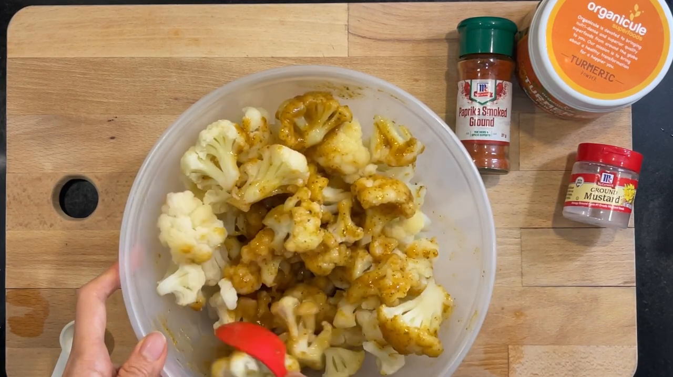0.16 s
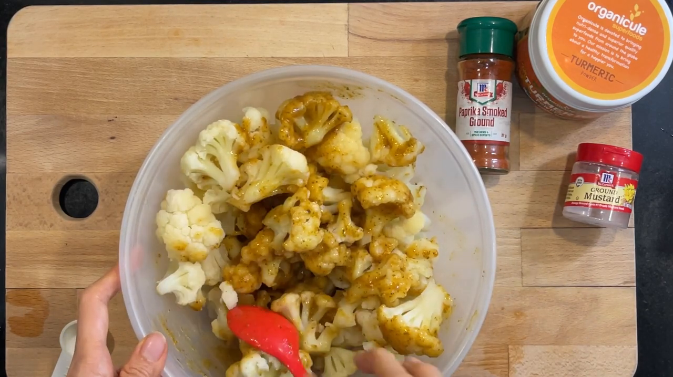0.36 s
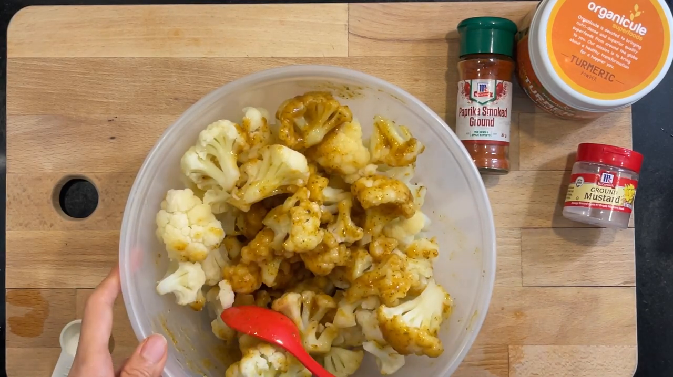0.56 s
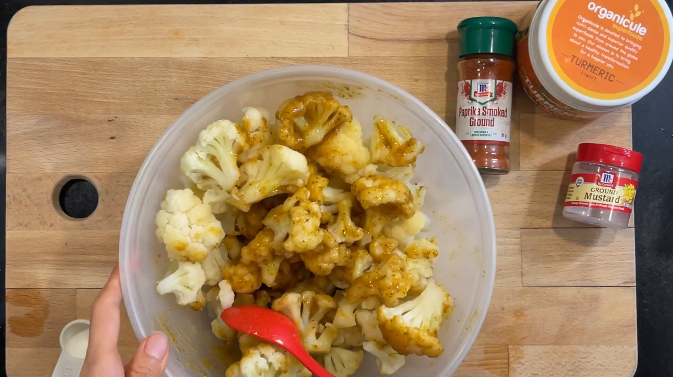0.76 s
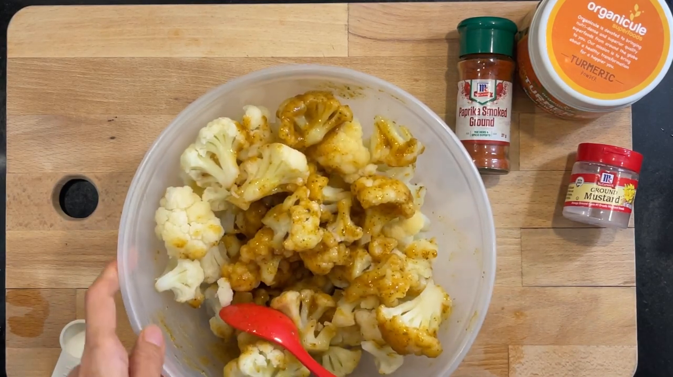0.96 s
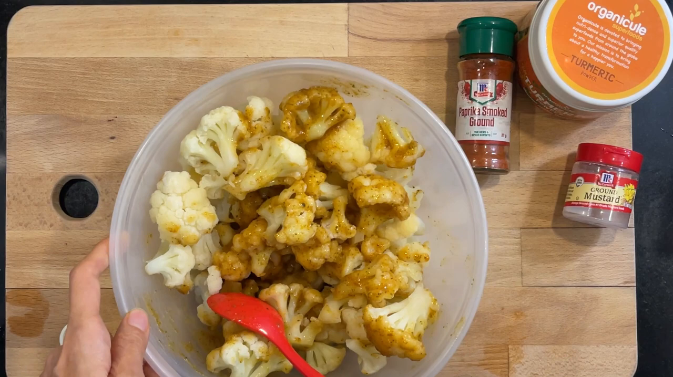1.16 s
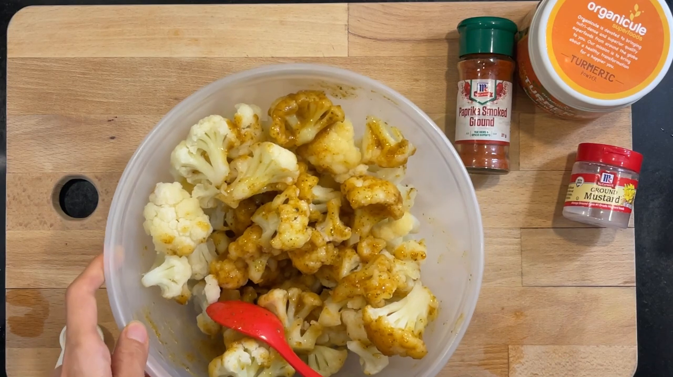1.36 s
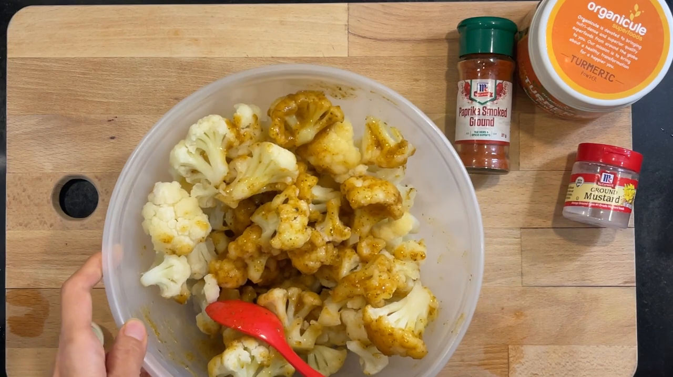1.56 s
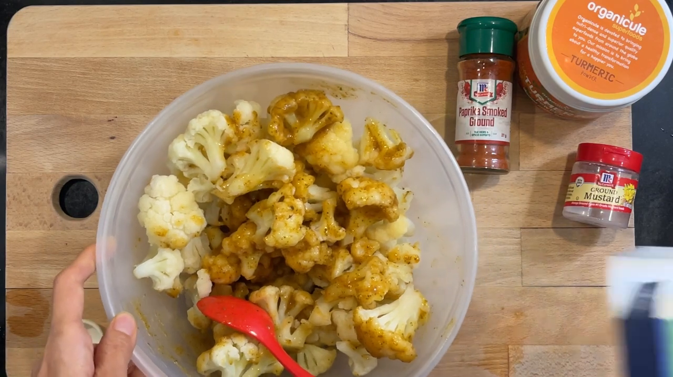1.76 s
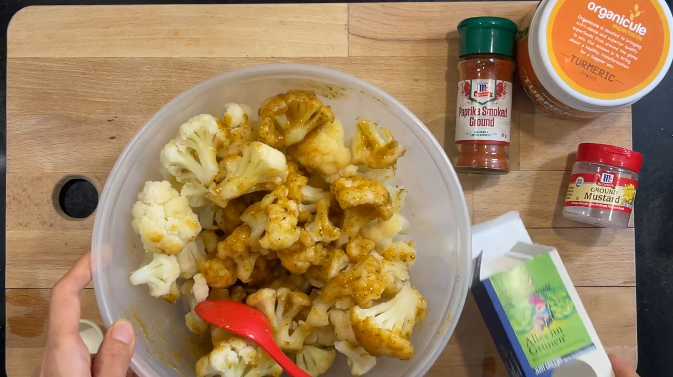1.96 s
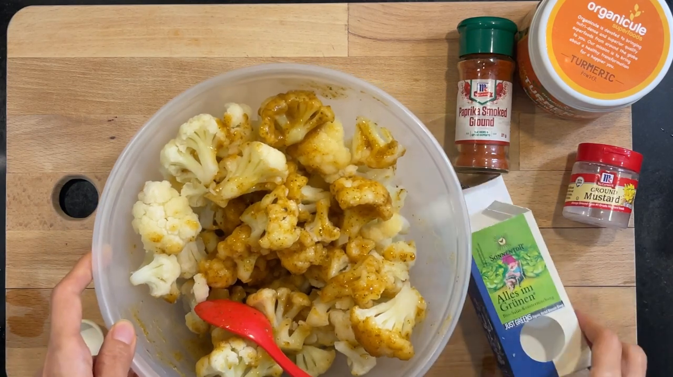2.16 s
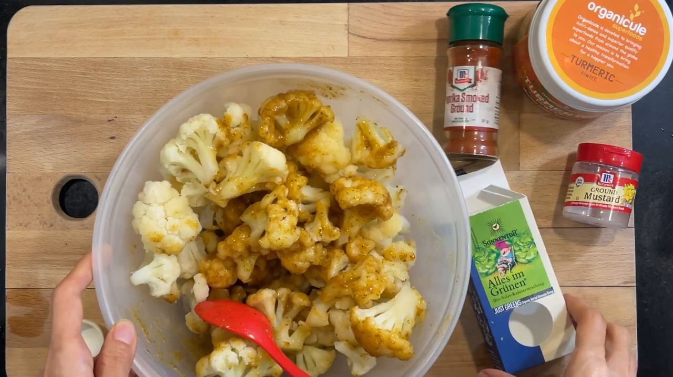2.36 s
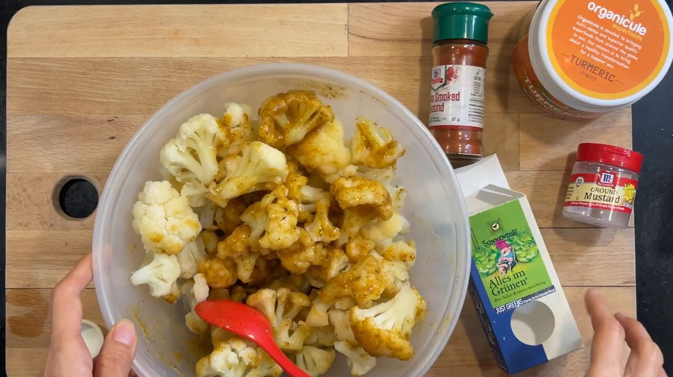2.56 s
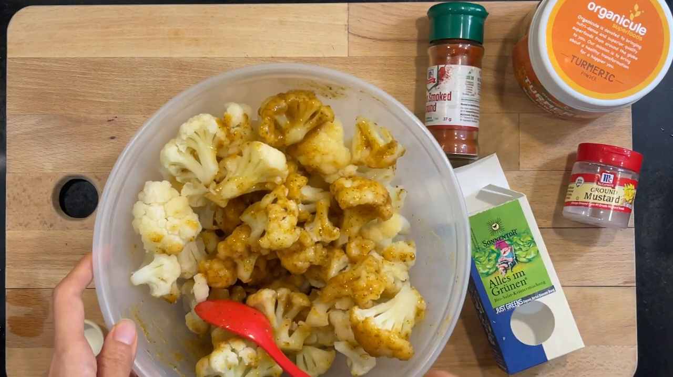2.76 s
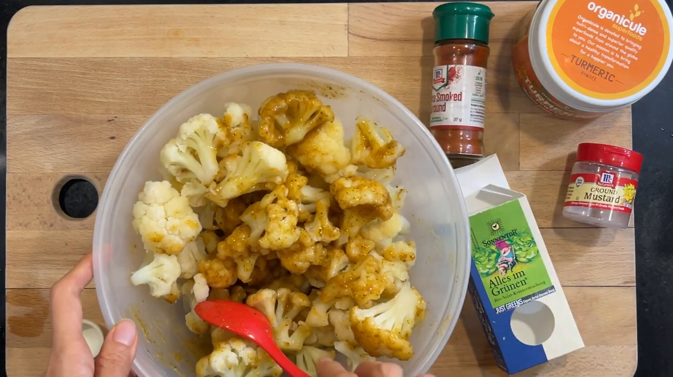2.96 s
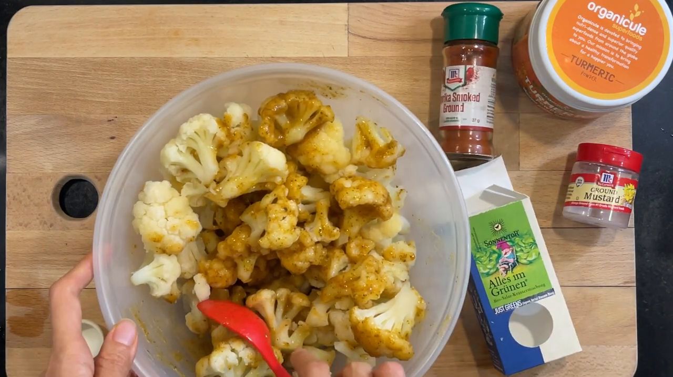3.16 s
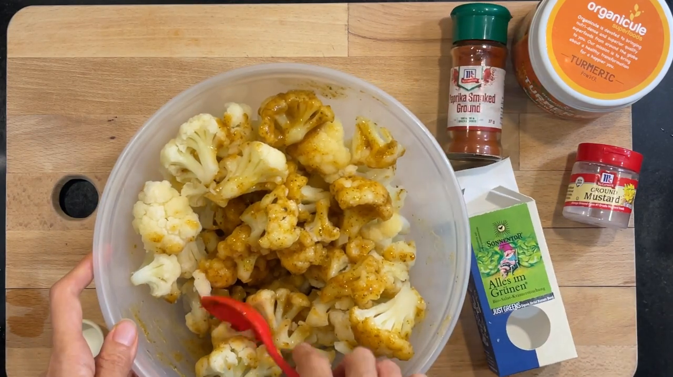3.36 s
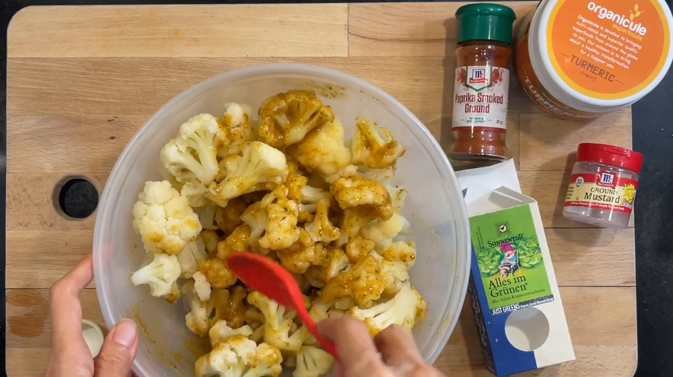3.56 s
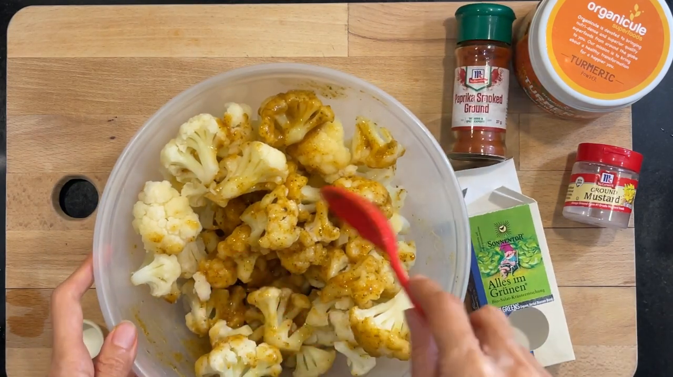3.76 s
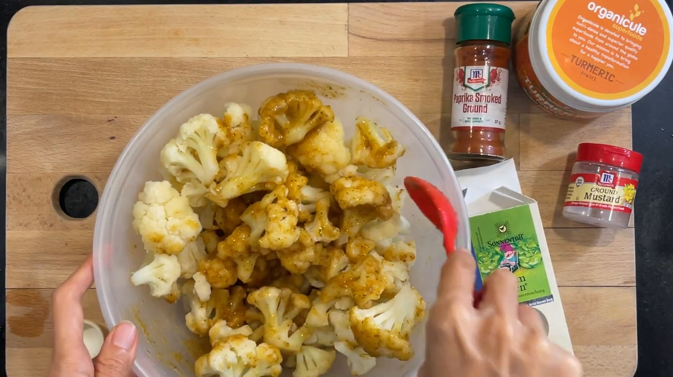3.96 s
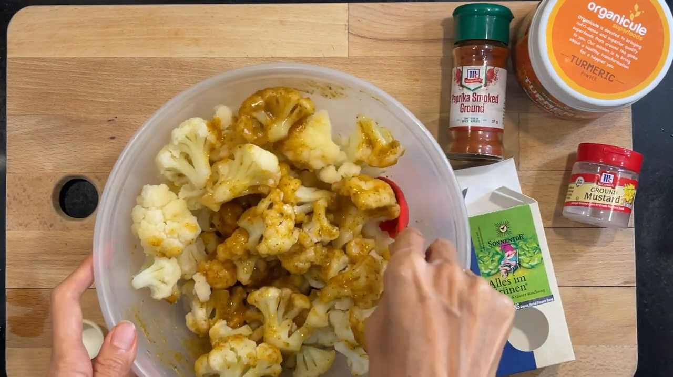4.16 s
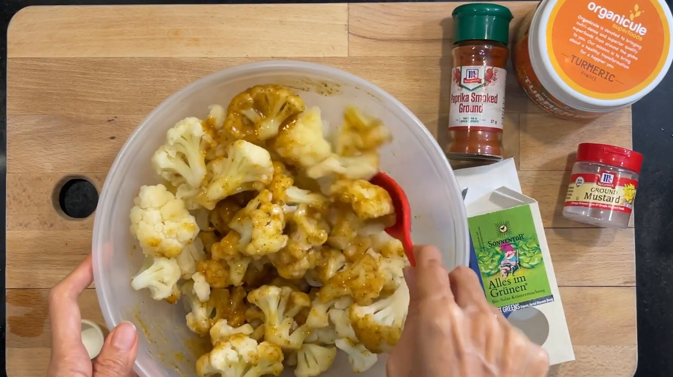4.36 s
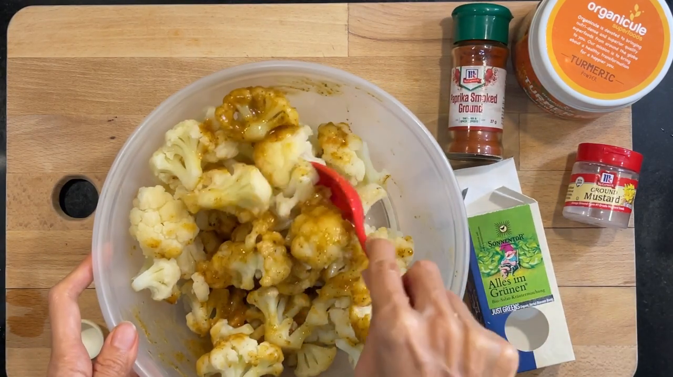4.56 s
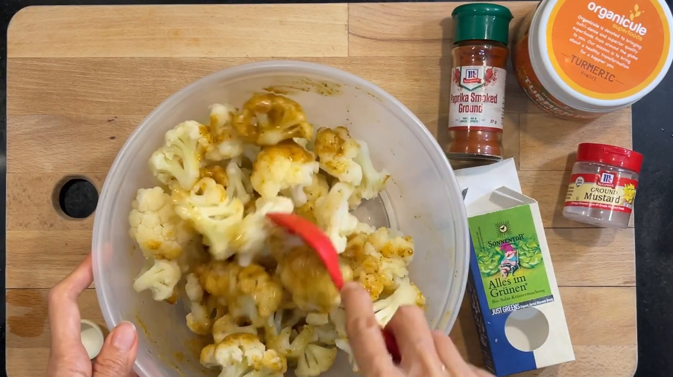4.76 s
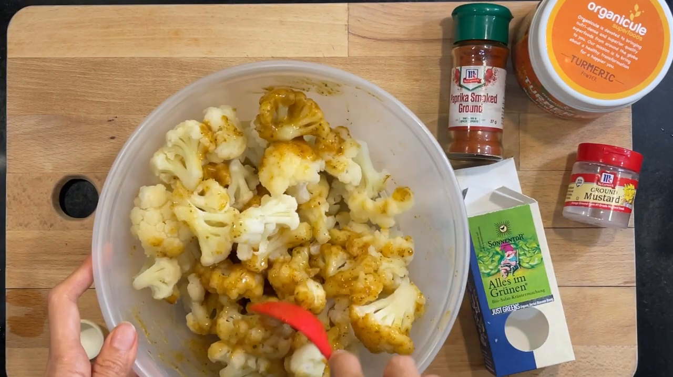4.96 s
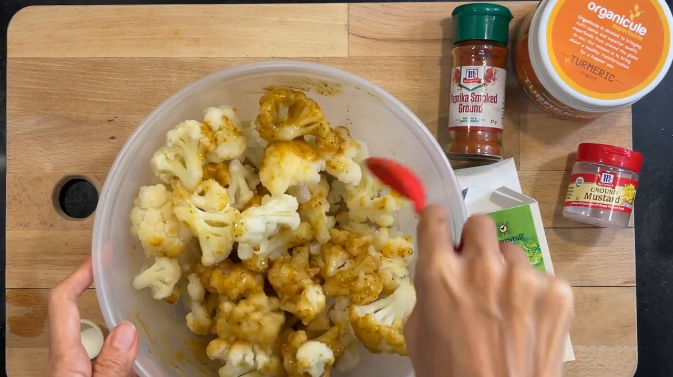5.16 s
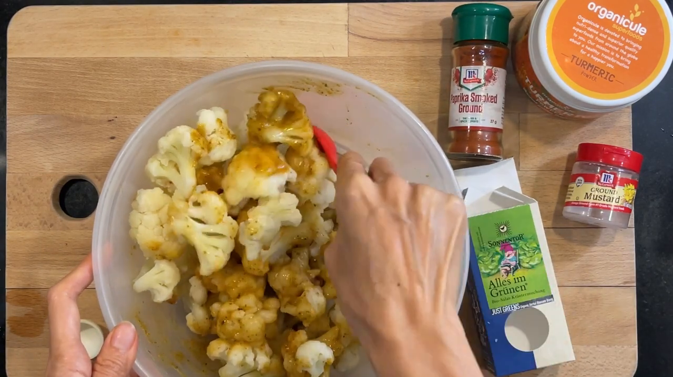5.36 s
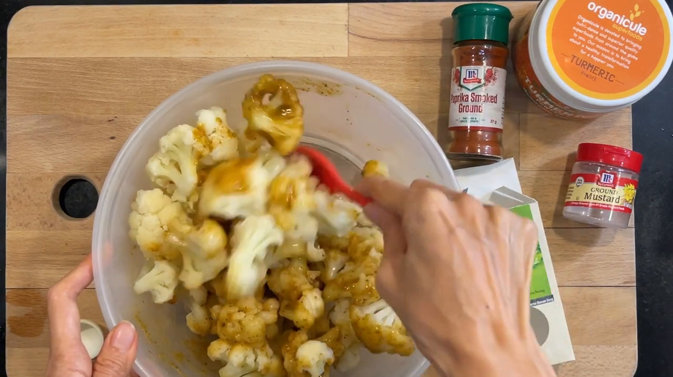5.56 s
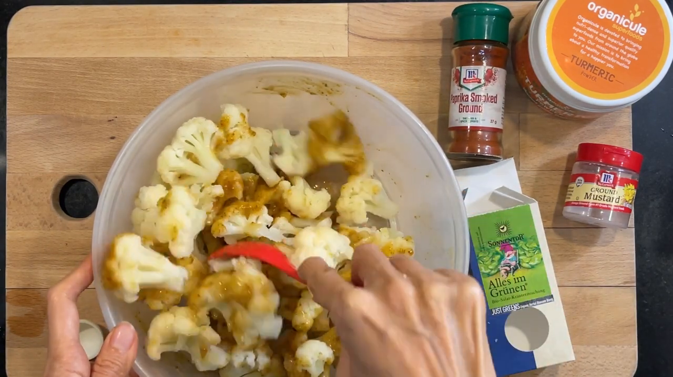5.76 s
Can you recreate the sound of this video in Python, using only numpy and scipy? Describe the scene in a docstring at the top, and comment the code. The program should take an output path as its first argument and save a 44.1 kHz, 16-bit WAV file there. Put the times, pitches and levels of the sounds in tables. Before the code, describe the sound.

A spoon works through coated cauliflower in a thin plastic bowl, giving dull short thuds, light clicks and dry scrapes at irregular intervals. Midway, activity nearly stops except for soft hand rustling, a stiff packet's short papery slide and a tiny glassy tick. The stirring then resumes more strongly. Close microphone, small kitchen with short echo, steady low hum beneath.

```python
"""Spoon in a bowl of coated pieces

Close two-port microphone in a kitchen: a spoon knocks and scrapes in a plastic bowl of coated vegetable
pieces on a wooden counter. Blows are rough contacts ringing in the bowl; rubbing is grainy filtered noise.
A hand or sleeve rustles softly; a packet slides (noise ringing in stiff walls) and nudges a jar (sines).
Behind, an appliance rumbles as a wavering low tone and steady narrow-band noise, over steady room tone.
The room answers the blows with a brief tail of sparse random echoes."""
import sys
import numpy as np
from scipy import signal
from scipy.fft import rfft, irfft, next_fast_len
from scipy.io import wavfile
from scipy.ndimage import uniform_filter1d

SR = 44100
rng = np.random.default_rng(int(sys.argv[2]) if len(sys.argv) > 2 else 0)


def output_pcm(signal):
    """Save a mono or channel-first signal as 16-bit PCM at the path in sys.argv[1].

    Samples are clipped to [-1, 1] before scaling.
    """
    pcm = np.clip(np.atleast_2d(signal).T, -1, 1) * 32767
    wavfile.write(sys.argv[1], SR, np.round(pcm).astype(np.int16))


def gain_from_decibels(decibels):
    """Convert decibel values to linear amplitude factors."""
    exponent = np.asarray(decibels, float) / 20
    return 10 ** exponent


N = 256662

# colour of the room tone, emptied above about 13 kHz: pitch_hz, density_db (relative, per Hz)
AIR_COLOUR = [(15, -47), (25, -11), (53, 0.5), (82, 0), (270, -22.5), (326, -22.5), (416, -21.5),
              (1190, -30.5), (4740, -50.5), (9070, -53.5), (11300, -52), (12300, -65), (13000, -100),
              (16000, -110)]
# level curve of the narrow low band near 65 Hz, with its random wavering: time_s, level_db (rms)
LOW_BAND_LEVEL = [(0, -54), (.15, -37.5), (.5, -48), (.62, -62.5), (.79, -45.5), (.91, -58.5),
                  (1.42, -38.5), (1.87, -46), (2.3, -42.5), (2.45, -52), (2.59, -41.5), (2.67, -54),
                  (2.77, -37), (2.97, -55.5), (3.08, -36), (3.36, -61.5), (3.44, -42), (3.7, -58),
                  (3.92, -40), (4.0, -53), (4.07, -33), (4.23, -44), (4.32, -42), (4.59, -49.5),
                  (4.94, -37), (5.14, -50.5), (5.32, -37.5), (5.64, -50.5), (5.79, -40)]
# low room modes fed by the appliance noise: pitch_hz, width_hz, level_db (rms)
ROOM_MODES = [(49.9, 7, -55.5), (85.7, 18.7, -50.5), (112.6, 16.5, -54.5), (205.3, 16.8, -63),
              (327, 24.7, -65.5)]
# how long the echo lasts by pitch, the top cut short: pitch_hz, t60_s
ECHO_DECAY = [(125, 0.18), (500, 0.33), (1500, 0.28), (4000, 0.23), (12000, 0.27), (13500, 0.035)]
# the packet's slide over the wood: time_s, level_db
SLIDE_LEVEL = [(2.012, -84), (2.034, -47), (2.13, -51.5), (2.23, -59.5), (2.316, -57.5), (2.45, -80)]
# resonances of the packet walls: pitch_hz, width_hz, level_db (relative)
PACKET_WALLS = [(2000, 52, 6.5), (2314, 47, 8), (3240, 260, -2), (3590, 30, 3), (5570, 50, -0.5),
                (6600, 65, -2), (8600, 45, -8.5), (8500, 87, -1), (9100, 230, -5), (10060, 55, 9)]
# tones of the nudged jar: pitch_hz, level_db, t60_s
JAR_TONES = [(5150, -49, 0.037), (6400, -51.5, 0.03), (5480, -70, 0.2)]
# modes of the bowl and the counter under it: pitch_hz, drive_db (relative, before weighting by t60), t60_s
BOWL_MODES = [(62, -3, 0.087), (138, -9, 0.048), (203.5, 0, 0.057), (340, -17, 0.06), (357, -6.5, 0.073),
              (585, 8, 0.022), (672, 5, 0.084), (682.5, 20.5, 0.011), (774, 13.5, 0.021),
              (872, -13.5, 0.078), (1098, 3, 0.0088), (1234, 0, 0.02), (1481, 9, 0.006),
              (2272, -4.5, 0.037), (2530, 12, 0.0026), (2900, -40, 0.0033), (4330, 21, 0.00047),
              (5740, -2, 0.0011), (7200, -2, 0.004), (11220, 16, 0.0016)]
# colour of the friction, emptied above about 13 kHz: pitch_hz, density_db (relative, per Hz)
RUB_COLOUR = [(150, -1), (300, -0.5), (1000, -11), (2200, -8.5), (4700, -13.5), (8100, -13), (11500, -10.5),
              (12500, -54), (13200, -85.5), (16000, -91)]
# soft rustling of a hand or sleeve that comes and goes: time_s, hiss_db
RUSTLE_LEVEL = [(0, -53.5), (.28, -68), (.45, -62), (.72, -69), (.95, -66.5), (1.34, -62.5), (1.43, -72),
                (1.6, -58.5), (1.69, -58), (1.78, -68.5), (1.9, -63.5), (2.0, -71), (2.4, -64), (2.53, -83),
                (2.62, -63.5), (2.76, -77), (3.02, -72.5), (3.29, -61), (3.43, -75.5), (3.58, -80.5),
                (3.69, -70), (3.95, -71), (4.3, -61.5), (4.53, -65), (4.64, -72.5), (4.95, -65.5),
                (5.08, -97.5), (5.18, -73), (5.45, -59), (5.82, -70)]
# wall sound of the rustling: low_db, middle_db (against its hiss)
RUSTLE_WALL_DB = [-3.5, -1]
# short scrapes: start_s, length_s, hiss_db, low_db, middle_db (wall sound against the hiss)
SCRAPES = [(0.094, 0.026, -55.5, 1, 0), (0.753, 0.03, -52, -16, -1.5), (0.861, .01, -62, 8, -4),
           (0.987, 0.0078, -61, 2, -5), (1.024, .012, -61.5, 8, 4.5), (1.061, 0.016, -50, 0.5, 3),
           (1.086, 0.0082, -50.5, 1, 4), (1.108, 0.005, -58.5, 12, 15), (1.17, 0.069, -51, -12, -7),
           (1.281, 0.012, -44.5, -10, -3), (1.316, 0.0065, -48.5, -2, 4.5), (2.438, 0.017, -70, -2, -4),
           (3.04, 0.011, -63.5, 3.5, -2.5), (3.094, 0.03, -76.5, -5, 14), (3.97, 0.0048, -61.5, 19, 12),
           (4.005, 0.0055, -41, -4, 0), (4.034, 0.035, -47, 6, 6), (4.352, 0.011, -49.5, -19, -23),
           (4.385, 0.016, -53.5, 11, 2), (4.74, 0.029, -59.5, -15, -13), (4.781, 0.0088, -50, -13, -34),
           (4.84, 0.012, -60, -3, -18), (5.199, 0.021, -52, 12.5, 5), (5.218, 0.023, -41.5, 0.5, 0),
           (5.246, 0.043, -42, 7.5, 11.5), (5.512, 0.012, -64, -8, -6), (5.567, 0.012, -58, -5, 1.5),
           (5.615, 0.047, -64, 10, -3), (5.7, 0.017, -61.5, 11, 7), (5.77, 0.0073, -56, 9, 3)]
# centres of the registers of a blow: thud_hz, body_hz, snap_hz
REGISTERS_HZ = [600, 2000, 6000]
# knocks and ticks: start_s, peak_db, body_db, snap_db (register gains on the scale where the thud sits at -12
# dB), pitch_factor (set by the load)
KNOCKS = [(0.085, -42, -21, -25, 0.65), (0.11, -44.5, -4.5, -18, 1.4), (0.124, -36, -18, -1, 0.93),
          (0.302, -6.5, -3.5, -7.5, 1.03), (0.415, -27, -7, -17.5, 1.01), (0.758, -32.5, -18, -11.5, 1.11),
          (0.774, -50, -13, -17, 0.77), (0.866, -39, -8, -19, 0.88), (0.999, -38, -32, -20, 0.52),
          (1.03, -46, -11, -24, 0.74), (1.052, -40.5, -4, -32, 1.24), (1.074, -49, 2, -5, 1.2),
          (1.092, -54, 0, -5, 1.01), (1.112, -32, 0, -17, 1.4), (1.162, -38, 0, -24, 1.6),
          (1.174, -37, 3, -38, 0.9), (1.257, -33.5, -24, -30, 0.89), (1.29, -39, 2, -7, 0.93),
          (1.314, -27.5, 10.5, 6, 1.2), (2.018, -44, 11, -10, 1.36), (2.033, -41, -2, -13, 0.9),
          (2.168, -38, -10, -35, 1.4), (3.034, -43, -10, -32, 1.13), (3.972, -32.5, 4, -6.5, 0.96),
          (4.008, -25, 11, 8, 0.98), (4.03, -28, -17, -12.5, 1.05), (4.092, -3.5, -6, -13, 0.95),
          (4.356, -39, -24, 5, 1), (4.383, -38, 6, -25, 0.59), (4.399, -26.5, -13.5, -29, 1.13),
          (4.684, -50, -23, 11, 0.86), (4.731, -43.5, -1, -13, 1.09), (4.819, -44, -19, 4, 0.82),
          (4.849, -61, 7, 1, 1.2), (4.905, -35.5, -26, -29, 0.61), (4.962, -20, 16, -2, 1.02),
          (5.186, -12, -0.5, -17.5, 0.85), (5.282, -2.5, -4, -10.5, 0.97), (5.476, -41, -5, -23, 1.19),
          (5.511, -37.5, 25, 15, 0.93), (5.57, -38, 5, 12, 0.95), (5.613, -35.5, -16, -26, 0.95),
          (5.639, -39, 1, -25, 0.91), (5.671, -39, -11, 0, 0.95), (5.713, -36, -24, -23, 0.67),
          (5.751, -44.5, -1, -14, 1.1), (5.776, -36, -9, -17.5, 0.96)]
# likeness of diffuse sound at the two microphone ports: pitch_hz, likeness (clipped to 0..1)
PORT_LIKENESS = [(60, -1.5), (200, 1.08), (600, 0.5), (1200, 0.44), (2200, 1.02), (5000, 0.9), (12000, 1)]
# phase between the ports: pitch_hz, left_lead_rad
PORT_LEAD = [(60, 0), (900, 0), (1550, -.2), (2200, .1), (3100, .65), (5000, .5), (6500, 0), (7900, .55),
             (8650, 0), (9300, -1.6), (10300, -3.14), (12050, -6.28), (13400, -9), (15300, -12.6)]
# level between the ports: pitch_hz, left_over_right_db
PORT_BALANCE = [(60, 0.2), (180, 3), (550, 1.7), (1650, 0.91), (4970, 0.0), (15000, 0.35)]


def evened(x):
    """Scales to rms 1."""
    return x / np.sqrt(np.mean(x ** 2) + 1e-20)


def read(points, hz):
    """Reads a table on a log-frequency axis."""
    f, value = np.transpose(points)
    return np.interp(np.log(hz + 1), np.log(f + 1), value)


def curve(rows):
    """Reads (time_s, value) rows at every sample."""
    return np.interp(np.arange(N) / SR, *np.transpose(rows))


def add(mix, start_s, sound):
    """Mixes a sound in at its start time."""
    part = mix[round(start_s * SR):][:len(sound)]
    part += sound[:len(part)]


def resonate(x, hz, width_hz):
    """Shifts hz down to zero, smooths twice, and shifts back."""
    turn = np.exp(2j * np.pi * hz * np.arange(len(x)) / SR)
    r = np.exp(-np.pi * width_hz / SR)
    once = signal.lfilter([1 - r], [1, -r], x / turn)
    twice = signal.lfilter([1 - r], [1, -r], once)
    return (turn * twice).real


def port_pair(hz, left, other):
    """Two channels of short-time spectra, alike by the share that the port spacing allows."""
    same = np.clip(read(PORT_LIKENESS, hz), 0, 1)[:, None]
    right = same * left + np.sqrt(1 - same ** 2) * other
    return np.array([left, right])


def noise(field_db, size, patchy_db):
    """Two-channel noise; field_db(hz, s) sets the level over frequency and time, in random patches."""
    hz = np.fft.rfftfreq(size, 1 / SR)
    s = np.arange(4 * N // size + 5) * size / 4 / SR
    a, b, c, d, e = rng.standard_normal((len(s), len(hz), 5)).T
    patches = evened(uniform_filter1d(uniform_filter1d(e, size=6, axis=0), size=6, axis=1))
    level_db = field_db(hz[:, None], s) + patchy_db * patches
    spectra = port_pair(hz, a + 1j * b, c + 1j * d) * gain_from_decibels(level_db)
    return signal.istft(spectra, nperseg=size, noverlap=3 * size // 4)[1][:, :N]


def grains(depth_db, size):
    """Stick-slip flutter of a rubbing level, smoothed over size samples."""
    flutter = evened(uniform_filter1d(rng.standard_normal(N), size=size))
    return evened(gain_from_decibels(depth_db * flutter))


def air():
    """Steady room tone: diffuse noise, held back below 140 Hz."""
    tone = noise(lambda hz, s: read(AIR_COLOUR, hz) - 15 * (hz < 140), size=2048, patchy_db=0.4)
    return gain_from_decibels(-56.5) * evened(tone)


def rumble():
    """A low tone of wavering pitch and level, and steady narrow-band noise in the low room modes, in mono."""
    centre_hz, waver_hz = 65.4, 2.51  # mean and rms waver
    hz = centre_hz + waver_hz * evened(uniform_filter1d(rng.standard_normal(N), size=8000))
    low_band = np.sqrt(2) * gain_from_decibels(curve(LOW_BAND_LEVEL)) * np.sin(2 * np.pi * np.cumsum(hz) / SR)
    drive = rng.standard_normal(N)
    return low_band + sum(gain_from_decibels(db) * evened(resonate(drive, f, width)) for f, width, db in ROOM_MODES)


def kitchen(x):
    """Sparse echoes of random sign, one in every 20 samples, each band dying at its own speed."""
    taps = np.zeros((2, SR // 2))
    at = np.arange(160, SR // 2 - 20, 20)
    at = at + rng.integers(0, 20, (2, len(at)))
    np.put_along_axis(taps, at, rng.choice([-1., 1.], at.shape), 1)
    hz, t, spectra = signal.stft(taps, SR, nperseg=256)
    decay = gain_from_decibels(-60 * t / read(ECHO_DECAY, hz)[:, None])
    tail = signal.istft(port_pair(hz, *spectra) * decay, SR, nperseg=256)[1]
    return signal.fftconvolve(x[None], tail / np.linalg.norm(tail[0]), axes=1)[:, :N]


def packet_slide():
    """Friction noise of the packet on the wood rings faintly in its stiff walls."""
    def colour_db(hz, s):
        walls = sum(gain_from_decibels(db) ** 2 / (1 + ((hz - f) / (width / 2)) ** 2) for f, width, db in PACKET_WALLS)
        edges_db = -20 * np.log10(1 + (1500 / (hz + 1)) ** 4 + (hz / 12000) ** 12)
        return 10 * np.log10(gain_from_decibels(-22) + walls) + edges_db

    hiss = evened(noise(colour_db, size=1024, patchy_db=3.5))
    t = np.arange(N) / SR
    moving = (t > SLIDE_LEVEL[0][0]) & (t < SLIDE_LEVEL[-1][0])
    flutter = grains(0.9, size=200) * grains(1.9, size=1500)  # fine and coarse
    return gain_from_decibels(curve(SLIDE_LEVEL)) * moving * hiss * flutter


def jar_clink():
    """The nudged jar rings in a few thin glass tones, starting softly."""
    out, t = np.zeros(N), np.arange(SR // 2) / SR
    tones = sum(gain_from_decibels(db - 60 * t / t60) * np.sin(2 * np.pi * hz * t) for hz, db, t60 in JAR_TONES)
    add(out, 2.438, tones * (1 - np.exp(-t / 0.0024)))
    return out


def bowl(hz, factor):
    """Response of the damped plastic wall: neighbouring modes answer with opposite sign."""
    return sum((-1) ** k * gain_from_decibels(db) * t60 / (1 + 1j * (hz - f * factor) * t60 / 1.1)
               for k, (f, db, t60) in enumerate(BOWL_MODES))


def strokes():
    """Gains of hiss, low and middle: each scrape grips quickly, holds and lets go, over the rustling."""
    grip_s, let_go_db_per_s = 0.0052, 700
    gains = gain_from_decibels(curve(RUSTLE_LEVEL) + np.array([0, *RUSTLE_WALL_DB])[:, None])
    for start_s, length_s, hiss_db, low_db, middle_db in SCRAPES:
        t = np.arange(0, length_s + .15, 1 / SR)
        release_db = let_go_db_per_s * np.maximum(t - length_s, 0)
        shape = np.minimum(t / grip_s, 1) * gain_from_decibels(hiss_db - release_db)
        for gain, db in zip(gains, [0, low_db, middle_db]):
            add(gain, start_s, gain_from_decibels(db) * shape)
    return gains


def crackle():
    """Sparse sudden slips of the pieces, about 70 a second: sharp start, dying in a few ms."""
    slips = (rng.random(N) < 70 / SR) * rng.exponential(0.17, N)
    return signal.lfilter([1], [1, -np.exp(-1 / (0.00073 * SR))], slips)


def rub():
    """Grainy friction hiss; pressing on the bowl wall drives its low and middle modes by changing amounts."""
    def colour_db(hz, s):
        return read(RUB_COLOUR, hz) + 7.7 * np.log10(abs(bowl(hz, 0.98)) + 1e-9)

    friction = noise(colour_db, size=256, patchy_db=2.5)
    out = 0
    bands_hz = [3000, 16000], [250, 800], [800, 3000]  # hiss, low, middle
    for gain, edges_hz in zip(strokes(), bands_hz):
        band = signal.butter(3, edges_hz, "band", fs=SR, output="sos")
        out = out + gain * evened(signal.sosfilt(band, friction))
    return out * grains(1.47, size=120) * (1 + crackle())


def knocks():
    """Each blow is a short rough contact that swells and dies, heard through the modes of the bowl."""
    contact_ms, lag_s_at_1khz, thud_db = 1.16, 0.001099, -12
    out, size = np.zeros(N), 8192
    hz, ms = np.fft.rfftfreq(size, 1 / SR), np.arange(1024) * 1000 / SR
    # bending waves in the wall: the treble arrives first, the lag grows as 1 / sqrt(Hz)
    travel = np.exp(-4j * np.pi * lag_s_at_1khz * np.sqrt(1000 * hz))
    grit = rng.standard_normal((len(KNOCKS), len(ms)))
    for (start_s, peak_db, body_db, snap_db, factor), rough in zip(KNOCKS, grit):
        u = ms / contact_ms
        touch = rfft(rough * u ** .2 * np.exp(-u), size)
        touch = touch / abs(touch) ** .8  # a hard contact feeds every frequency about evenly
        gains_db = read(list(zip(REGISTERS_HZ, [thud_db, body_db, snap_db])), hz)
        sound = irfft(touch * travel * gain_from_decibels(gains_db) * bowl(hz, factor))[:size // 2]
        add(out, start_s, gain_from_decibels(peak_db) * sound / abs(sound).max())
    return out


def scene():
    """Room noise, the echo of the blows 10 dB down, and the near sounds."""
    blows = knocks() + jar_clink()
    room = air() + rumble() + gain_from_decibels(-10.0) * kitchen(blows)
    return room + packet_slide() + rub() + blows


def band_limit(x):
    """A steep low-pass at the top of the band."""
    return signal.sosfilt(signal.butter(12, 16820, fs=SR, output="sos"), x)


def record(dry):
    """The two microphone ports differ in level and phase by frequency; the top is cut at 16.5 kHz."""
    size = next_fast_len(N + 4096)
    hz = np.fft.rfftfreq(size, 1 / SR)
    side = np.array([[.5], [-.5]])  # each port takes half of the difference
    ports = gain_from_decibels(side * read(PORT_BALANCE, hz)) * np.exp(1j * side * read(PORT_LEAD, hz))
    top_cut = 1 / (1 + (hz / 16500) ** 80)
    mix = irfft(rfft(dry, size) * ports * top_cut, size)[:, :N]
    return band_limit(mix)


dry = scene()
out = record(dry)
output_pcm(out)
```